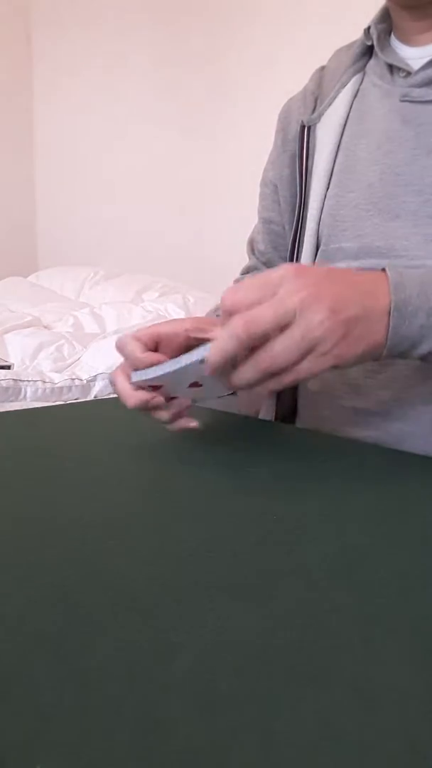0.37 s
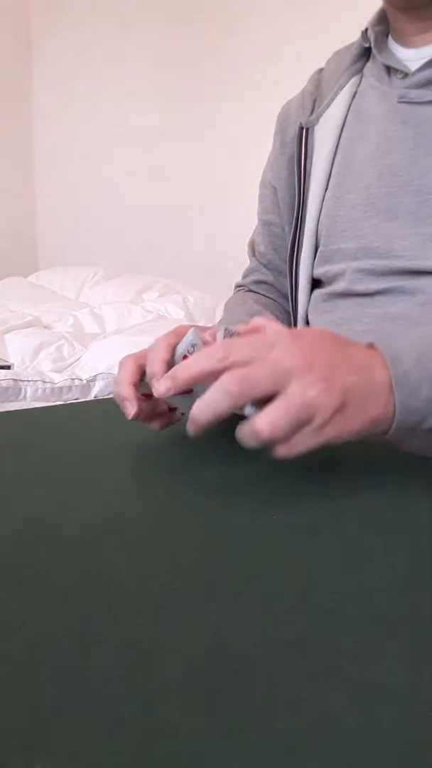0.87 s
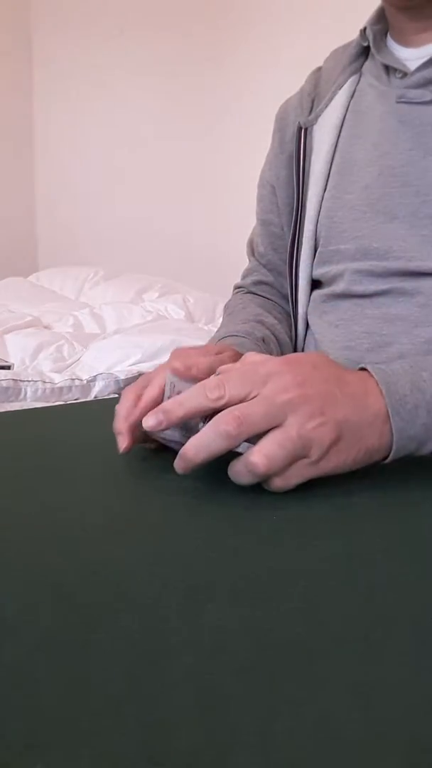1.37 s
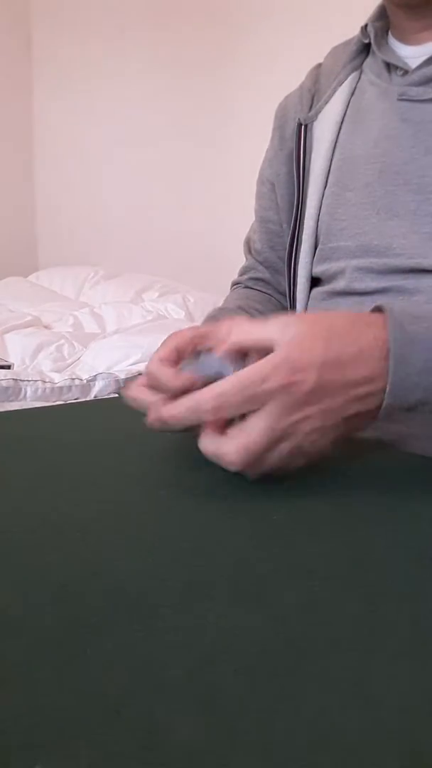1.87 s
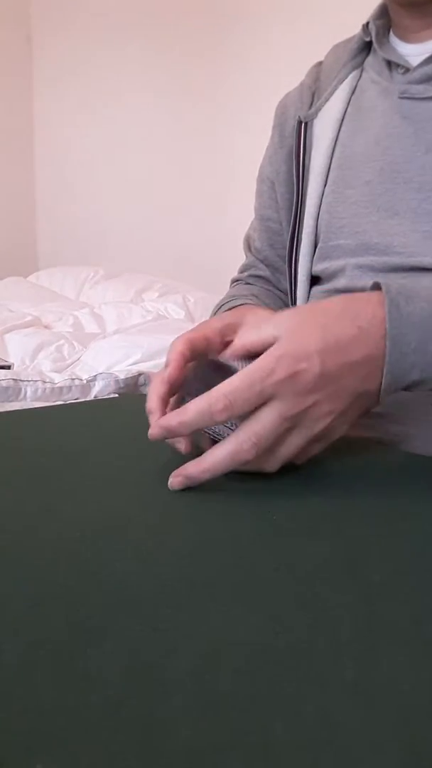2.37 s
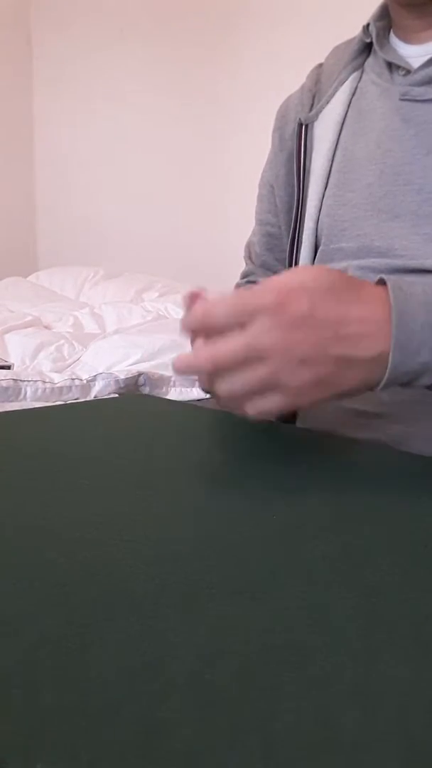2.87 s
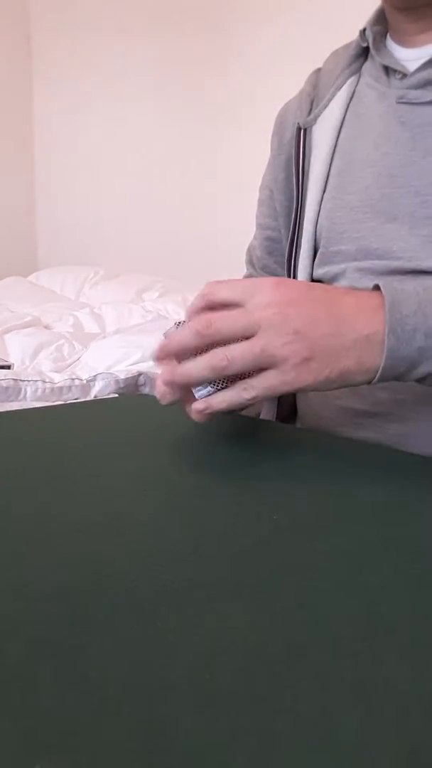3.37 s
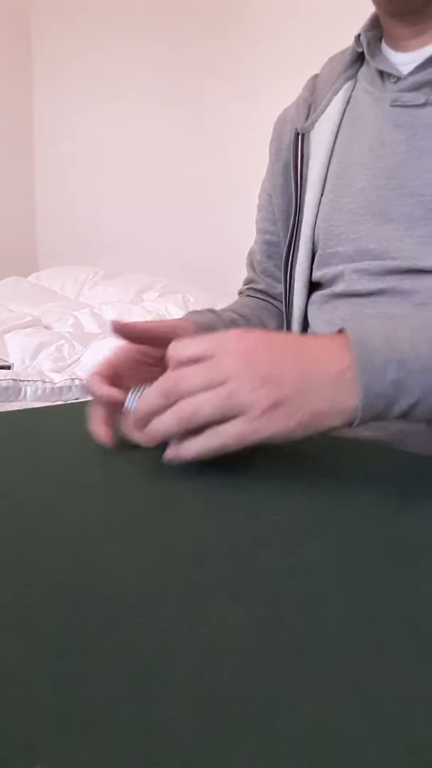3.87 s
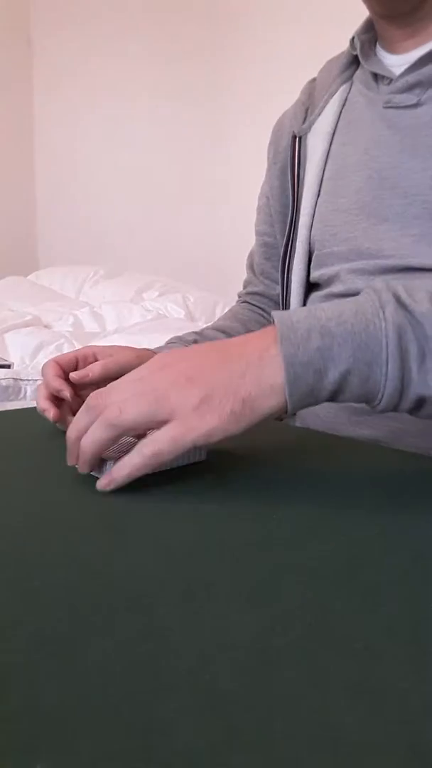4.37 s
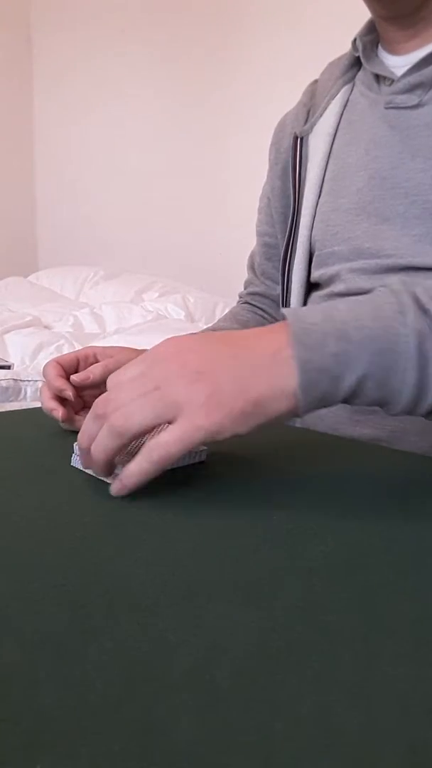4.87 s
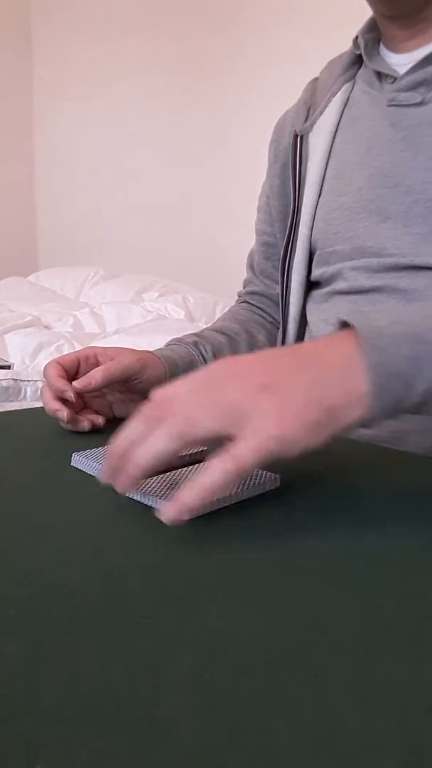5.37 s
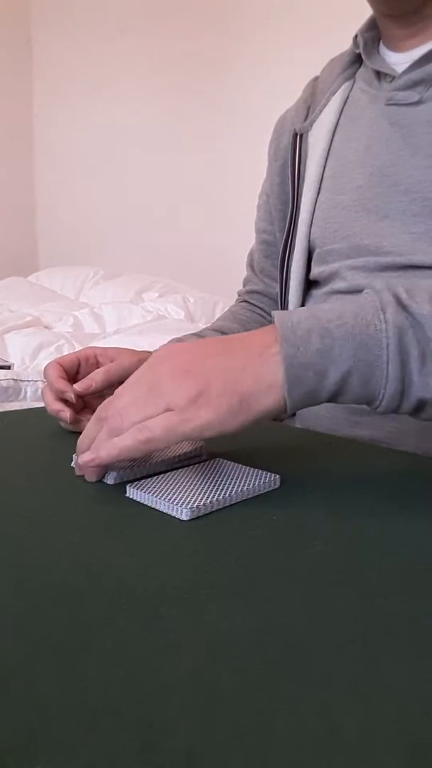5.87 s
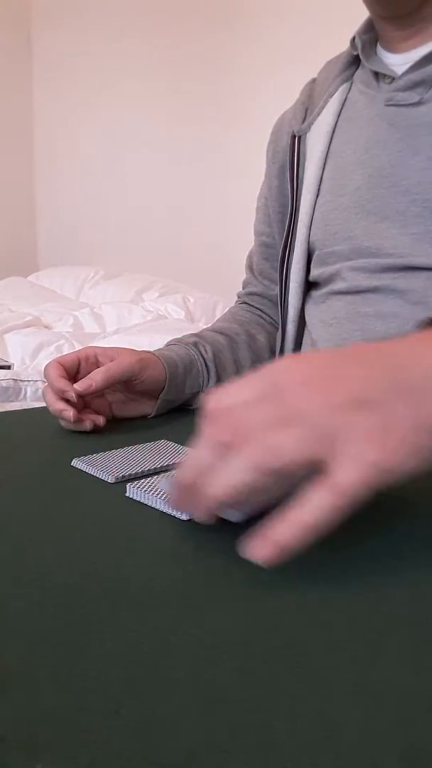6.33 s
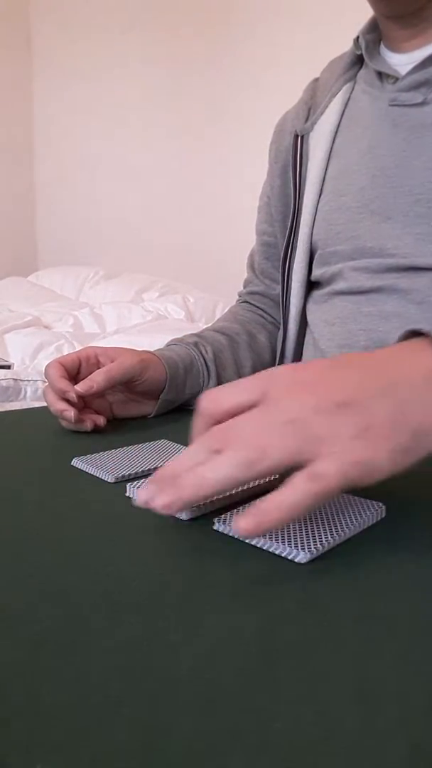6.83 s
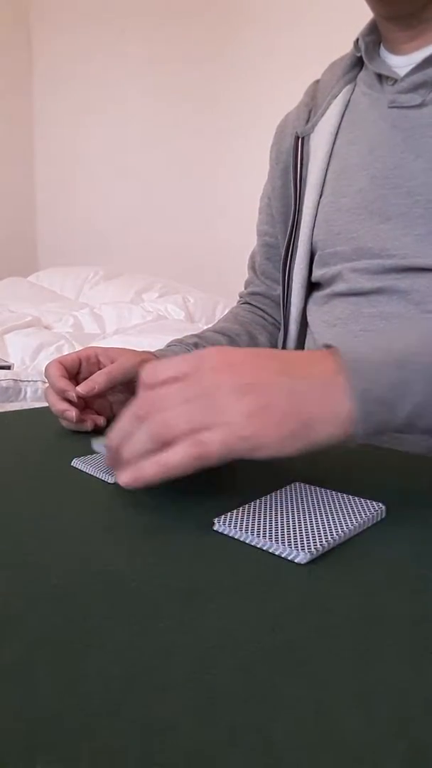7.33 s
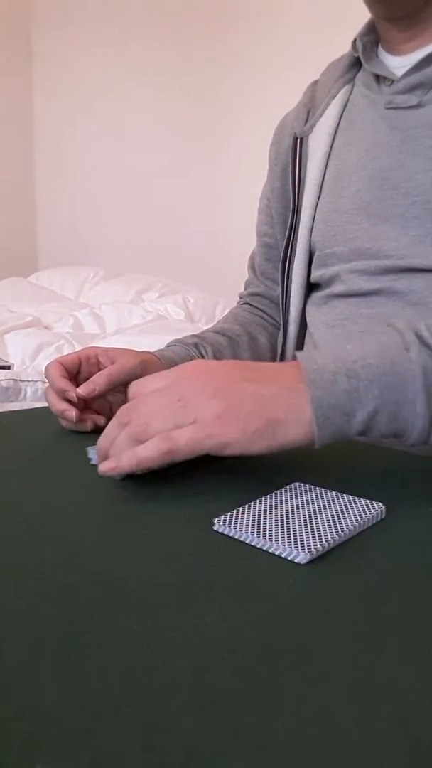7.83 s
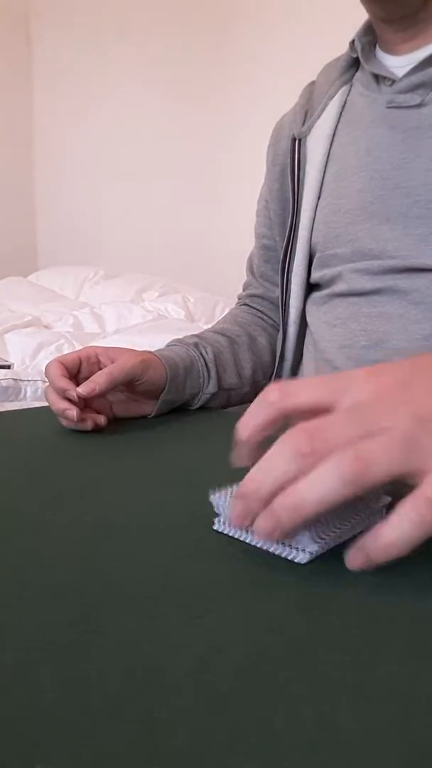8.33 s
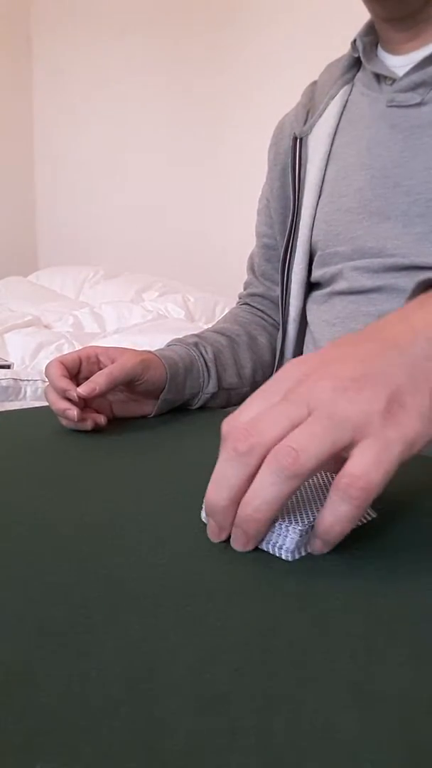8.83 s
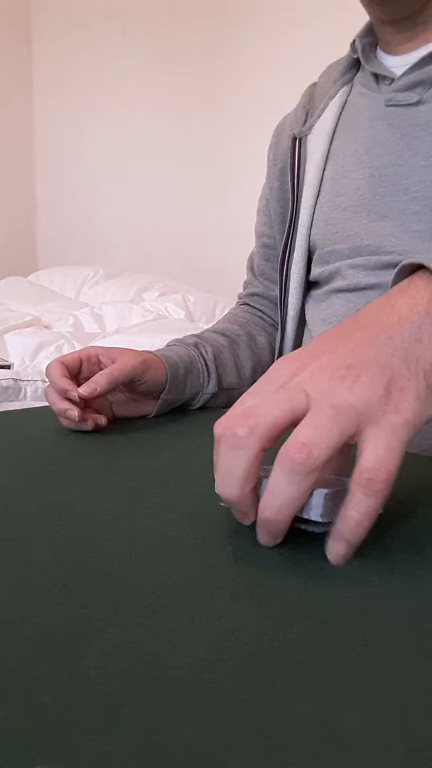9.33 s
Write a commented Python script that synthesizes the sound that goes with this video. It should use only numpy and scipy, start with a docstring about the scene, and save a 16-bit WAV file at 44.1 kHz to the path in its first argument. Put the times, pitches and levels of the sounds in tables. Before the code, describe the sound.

Hands work a deck of playing cards at a cloth-covered table. After faint rubs and ticks comes a loud, rapid riffle of crisp snaps, then a dull thump and a lighter fluttering cascade. A quiet gap of soft sliding follows, then piles are set down with low thuds and restacked with papery taps. Close stereo microphone, heavier on the right, small soft room with faint hum and hiss.

```python
"""Hands riffle a deck of cards, let it cascade, then cut it into piles and restack it on a cloth-covered table.
Card edges snap as short rings and cracks; cards rub and fizz as grainy noise shaped by resonances.
Each pile set down thumps the table top, low resonances that reach the nearer right microphone most.
Late on, the squared-up deck is knocked and rings. A small soft room answers over a faint hum and hiss."""
import sys
import numpy as np
from scipy import signal
from scipy.fft import rfft, irfft, next_fast_len
from scipy.io import wavfile
from scipy.ndimage import map_coordinates

SR = 44100
rng = np.random.default_rng(int(sys.argv[2]) if len(sys.argv) > 2 else 0)


def inscribe(sig):
    """Save sig as 16-bit PCM at rate SR to the path in sys.argv[1].

    A 1-D sig is mono; a 2-D sig holds one channel per row.
    Samples are clipped to [-1, 1] before scaling.
    """
    pcm = np.round(np.clip(np.atleast_2d(sig).T, -1, 1) * 32767)
    wavfile.write(sys.argv[1], SR, pcm.astype(np.int16))


def gain_from_decibels(decibels):
    """Convert decibel values to linear amplitude factors."""
    exponent = np.asarray(decibels, float) / 20
    return 10 ** exponent


N = 417186  # length in samples

# What the squared-up deck rings with; rubbing wakes the lowest three.
# Each row: frequency in Hz, width in Hz, level in dB.
DECK_RINGS = [(388, 69, 2.5), (680, 190, -2), (924, 820, -9.5), (1549, 420, -4), (2880, 210, -14.5),
              (4250, 780, -26)]


def unit(x):
    """Scale to an rms (average strength) of 1."""
    return x / np.sqrt(np.mean(x ** 2) + 1e-20)


def along(points, hz):
    """Read a curve of (Hz, value) points on a log frequency axis."""
    point_hz, values = np.transpose(points)
    return np.interp(np.log(hz + 1), np.log(point_hz + 1), values)


def curves(rows):
    """One value per sample for each column after the time."""
    times, *columns = np.transpose(rows)
    return [np.interp(np.arange(N) / SR, times, column) for column in columns]


def filtered(x, response):
    """Multiply the spectrum of x by a response that depends on frequency."""
    size = next_fast_len(N + SR // 4)
    spectrum = rfft(x, size) * response(np.fft.rfftfreq(size, 1 / SR))
    return irfft(spectrum, size)[..., :N]


def mode(f, hz, width):
    """One resonance: it starts to ring when struck; a wider one dies away sooner."""
    return 1j * f * width / (hz * hz - f * f + 1j * f * width)


def modes(rows):
    """Several resonances added with alternating sign."""
    return lambda f: sum((-1) ** k * gain_from_decibels(db) * mode(f, hz, width) for k, (hz, width, db) in enumerate(rows))


def pair(colour, split_hz, source):
    """Two channels of coloured noise, alike in the bass and less and less related above split_hz."""
    turn = lambda hz: np.pi / 4 * hz / (hz + split_hz)
    mid, side = filtered(source, lambda hz: colour(hz) * [np.cos(turn(hz)), np.sin(turn(hz))])
    return unit(np.array([mid + side, mid - side]))


def grainy(spread_db, grain_s):
    """Noise whose strength varies at random from one tiny contact to the next."""
    knots = rng.standard_normal(int(N / SR / grain_s) + 4)
    strength = gain_from_decibels(spread_db * map_coordinates(knots, [np.arange(N) / SR / grain_s], order=1))
    return unit(rng.standard_normal((2, N)) * strength)


def slide():
    """Fibres catch and let go: a grainy rub, a finer fizz, and the drag that shakes the table."""
    # Resonances of a fanned stream of cards. Each row: frequency in Hz, width in Hz, level in dB.
    fanned = [(1100, 1200, -0.5), (1913, 1200, 0), (2650, 400, 3.5), (4600, 2500, -4.5)]
    # Resonances that rubbing wakes in bent cards. Each row: frequency in Hz, width in Hz, level in dB.
    bent = [(1207.6, 490, 11), (1980, 2100, 7.5), (4330, 1200, -19.5)]
    # Colour of the fizz. Each row: frequency in Hz, relative level per Hz in dB.
    fizz_colour = [(2100, -17.5), (4800, -7), (8200, -6), (16000, -16)]
    laid_down_s, stacked_s = 3.7, 9.2  # the deck reaches the table; it is whole again

    stream_gain, stroke_gain, fizz_gain = sliding()
    rub_gain = stream_gain + stroke_gain
    t = np.arange(N) / SR
    on_table = np.clip((t - laid_down_s) * 5, 0.06, 1)  # the deck is held up until it is laid down

    # cloth evens out the grain
    smooth = 0.6 * on_table
    grains = np.sqrt(1 - smooth) * grainy(spread_db=4, grain_s=0.0035)
    grains = grains + np.sqrt(smooth) * rng.standard_normal((2, N))

    stream_colour = lambda hz: modes(fanned)(hz) / (1 + (hz / 8000) ** 2)
    stroke_colour = lambda hz: modes(bent)(hz) / (1 + (hz / 6500) ** 2)
    rub = stream_gain * pair(stream_colour, 2000, grainy(spread_db=2.5, grain_s=0.0027))
    rub += stroke_gain * pair(stroke_colour, 1600, grains)

    # piles hum lower than fanned cards, more as they grow
    thick = np.interp(t, [laid_down_s, stacked_s], [0.15, 1], left=0)
    pile_hum = unit(filtered(grainy(spread_db=5, grain_s=0.005)[0], modes(DECK_RINGS[:3])))
    rub += thick * rub_gain * gain_from_decibels(3) * pile_hum

    fizz_noise = grainy(spread_db=5, grain_s=0.0018)
    fizz = fizz_gain * pair(lambda hz: gain_from_decibels(along(fizz_colour, hz)), 2300, fizz_noise)
    shake = rng.standard_normal((2, N))
    drag = on_table * rub_gain * gain_from_decibels(34.5) * (shake[1] + 0.47 * shake)  # partly shared by both channels
    return rub, fizz, drag


def sliding():
    """Gains of stream, stroke and fizz: every stroke swells to its peak and fades."""
    # The two streams of running cards. Each row: time in seconds, rub level in dB, fizz level in dB.
    riffle = [(1.21, -70.5, -90.5), (1.27, -46.5, -49), (1.32, -51.5, -60.5), (1.365, -28.5, -40),
              (1.46, -28, -29.5), (1.5, -27, -31.5), (1.535, -36.5, -46.5), (1.56, -29, -40.5),
              (1.62, -31, -46.5), (1.81, -79, -89)]
    cascade = [(2.25, -78, -87), (2.311, -46.5, -46), (2.401, -42, -42.5), (2.47, -38.5, -42.5),
               (2.581, -68, -74.5)]
    # Single slides of cards on cards or cloth. Each row: peak time in seconds, rise in seconds,
    # fall in seconds, rub level in dB, fizz against rub in dB.
    strokes = [(.12, 0.042, 0.27, -60.5, -3.5), (0.522, 0.3, 0.14, -60, -4.5), (0.699, .1, .08, -56.5, -6),
               (1.942, 0.11, 0.095, -58.5, -11), (2.168, 0.082, 0.054, -54.5, -13.5),
               (2.66, 0.12, 0.141, -62, -20), (3.201, 0.19, 0.23, -76.5, 10), (3.44, 0.11, .12, -65, 2),
               (3.928, 0.012, 0.079, -58, -30), (4.219, 0.42, 0.38, -59, -10.5),
               (5.09, 0.021, 0.49, -65, -7), (5.322, 0.28, 0.1185, -58.5, -7),
               (5.729, 0.024, 0.073, -62.5, -16), (6.619, 0.057, 0.037, -54, -9),
               (6.678, 0.091, 0.075, -62.5, -1.5), (7.025, 0.06, 0.08, -53.5, -4),
               (7.099, 0.091, 0.215, -60, -12), (7.209, .12, .07, -61.5, -12.5),
               (7.642, 0.016, 0.33, -62.5, -3), (7.852, 0.19, 0.23, -57, -12), (8.56, 0.13, 0.032, -57, -5),
               (8.73, 0.29, 0.16, -57.5, -7.5), (8.943, 0.017, 0.16, -58.5, -14),
               (8.985, 0.067, 0.021, -59, -8.5), (9.083, 0.028, 0.22, -61, -13),
               (9.213, 0.065, 0.043, -64.5, -0.5), (9.38, 0.097, .1, -53.5, -5),
               (9.45, 0.068, .1, -45.5, -11)]
    depth_db, roundness = 23.5, 1.3  # drop at the ends of rise and fall; 1 = pointed, more = rounder

    t = np.arange(N) / SR
    power = np.zeros((3, N))
    for stream in riffle, cascade:
        running = (t > stream[0][0]) * (t < stream[-1][0])
        power[::2] += gain_from_decibels(curves(stream)) ** 2 * running
    for peak_s, rise, fall, db, fizz_db in strokes:
        away = np.abs(t - peak_s) / np.where(t < peak_s, rise, fall)
        stroke_db = db - depth_db * away ** roundness
        power[1:] += gain_from_decibels(stroke_db + [[0], [fizz_db]]) ** 2
    return np.sqrt(power)


def snaps():
    """A flick or tap gives a short ring at its own pitch; higher ones, from stiffer edges, also crack more."""
    # Card edges snapping free or tapping; the two low rows near 2.13 s are the dull upper part
    # of a pile's thump. Each row: start in seconds, level in dB, pitch in Hz.
    flicks = [(0.112, -42, 1350), (0.479, -33, 1863), (0.491, -37, 1390), (0.522, -25.5, 1580),
              (0.624, -36, 1335), (1.228, -23, 1964), (1.252, -30, 2000), (1.261, -21, 1530),
              (1.272, -29, 1800), (1.281, -24.5, 1230), (1.292, -21, 1100), (1.349, -8, 4800),
              (1.364, -12.5, 2650),  (1.381, -9.5, 2179), (1.402, -6, 2883), (1.445, -6.5, 4500),
              (1.45, -8.5, 1940), (1.454, -10.5, 7500), (1.466, -8.5, 7000), (1.475, -13, 4800),
              (1.496, -11, 2500), (1.514, -10.5, 1293), (1.543, -8.5, 2667), (1.592, -10, 1357),
              (1.597, -12, 2352), (1.626, -11, 2750), (2.122, -25, 457.5), (2.136, -25, 485),
              (2.334, -24, 2000), (2.348, -17, 2100), (2.36, -20, 3443), (2.38, -11.5, 1277),
              (2.383, -12.5, 3480), (2.401, -17.5, 1300), (2.416, -22, 3000), (2.42, -18.5, 1600),
              (2.447, -22, 1530), (2.466, -23.5, 2000), (2.931, -41.5, 1313), (3.933, -46, 2100),
              (5.263, -42, 1990), (5.715, -43, 1310), (7.637, -28.5, 1310), (8.441, -28.5, 843)]
    out = np.zeros((2, N + SR))
    t = np.arange(SR // 20) / SR
    # a fast crack with a fainter, slower tail
    burst = (1 - np.exp(-t / 0.00034)) * (gain_from_decibels(-60 * t / 0.023) + 0.13 * gain_from_decibels(-60 * t / 0.14))
    for s, db, hz in flicks:
        # the ring falls by 60 dB in 11 cycles
        ring = np.sin(2 * np.pi * hz * t) * gain_from_decibels(-60 * t * hz / 11) * (1 - np.exp(-t * hz * 4))
        noise = rng.standard_normal((3, len(t)))
        pole = np.exp(-2 * np.pi * min(2.7 * hz, 6500) / SR)
        crack = signal.lfilter([1], np.poly([pole, pole, pole]), noise[0] + 2.2 * noise[1:])
        crack *= min(hz + 900, 5000) / 7000 / np.std(crack)
        out[:, round(s * SR):][:, :len(t)] += gain_from_decibels(db) * (ring + crack * burst)
    # a thin card moves little bass
    return signal.lfilter([1, -1], [1, -np.exp(-2 * np.pi * 400 / SR)], out[:, :N])


def knocks():
    """Each knock is a short scratchy contact that rings the block of cards."""
    # The squared-up deck knocked by a pile or a finger. Each row: start in seconds, strength in dB.
    hits = [(8.501, -37.5), (8.529, -28), (8.551, -37), (8.567, -26.5), (8.652, -37), (8.706, -35),
            (8.969, -47), (9.408, -32), (9.424, -28), (9.433, -31), (9.444, -31), (9.454, -23.5)]
    contact_s = 0.0033  # sets the length of the contact
    blows = np.zeros(N + SR)
    t = np.arange(SR // 40) / SR
    for s, db in hits:
        bump = t / contact_s * np.exp(-2 * t / contact_s)
        scratch = 0.95 + 0.7 * rng.standard_normal(len(t))
        blows[round(s * SR):][:len(t)] += gain_from_decibels(db) * bump * scratch
    return gain_from_decibels(27.5) * filtered(blows[:N], modes(DECK_RINGS))


def table(drag):
    """Soft pushes and the drag of cards set the table top ringing low."""
    # Resonances of the table top. Each row: frequency in Hz, width in Hz, right level in dB, left level in dB.
    top_rings = [(58, 71, -12.5, -18.5), (91.9, 19, -2, -13.5), (122.5, 12, 2, -9.5),
                 (153.8, 13, 1.5, -11.5), (215.5, 24, -0.5, -20.5), (330, 60, -16, -27)]
    pushes = np.zeros(N + SR)
    push = np.hanning(80)  # flesh and cloth spread each push over about 2 ms
    for s, db in thumps():
        pushes[round(s * SR):][:len(push)] += 1.9 * gain_from_decibels(db) * push

    def body(f):
        """The resonances, added with alternating sign, for left and right."""
        return sum((-1) ** k * gain_from_decibels([[left], [right]]) * mode(f, hz, width)
                   for k, (hz, width, right, left) in enumerate(top_rings))

    # weaken the deepest bass below 50 Hz and the part above 900 Hz
    band = lambda f: (1j * f / (50 + 1j * f) / (1 + 1j * f / 900)) ** 2
    return filtered(pushes[:N] + drag, lambda f: body(f) * band(f))


def thumps():
    """A pile touches with its edge, falls flat and settles; a hand just presses."""
    # Piles set down on the table. Each row: flat-down time in seconds, strength in dB,
    # lead of the edge in seconds.
    landings = [(2.137, -4.5, 0.017), (4.349, -12, 0.024), (5.321, -13.5, 0.01805), (5.747, -17, 0.024),
                (6.625, -14, .017), (7.002, -19, 0.016), (7.648, -4, 0.00792), (7.678, -5.5, .015),
                (8.573, -5.5, 0.039)]
    # Hands pressing on the table top. Each row: start in seconds, strength in dB.
    presses = [(1.351, -14), (1.451, -11), (1.54, -8.5), (1.586, -10.5), (1.603, -5.5), (2.191, -10.5),
               (7.134, -21.5), (7.21, -22), (7.867, -15.5), (8.446, -5), (8.473, -11), (8.658, -15),
               (8.711, -18.5), (9.092, -21), (9.436, -16.5), (9.446, -10.5)]
    edge_db, settle_db = -4, -8.5  # against the flat blow
    settle_late = 1.5  # settling delay, counted in edge leads
    pushes = list(presses)
    for s, db, lead in landings:
        pushes += [(s - lead, db + edge_db), (s, db), (s + settle_late * lead, db + settle_db)]
    return pushes


def puff():
    """One slap of cards shoves air at the right microphone: a sharp dip, then a slower swell."""
    u = (np.arange(N) / SR - 1.4068) / 0.00059  # time from the dip, in units of 0.59 ms
    swell = 0.5 * np.exp(-np.abs(u - 2.4) / np.where(u > 2.4, 2.2, 0.6))
    dip = np.exp(-u ** 2 / 2)
    return gain_from_decibels([[-24], [-6]]) * (swell - dip)


def room(x):
    """Each frequency of the room's answer, a tail of noise, dies at its own speed."""
    # The room's decay. Each row: frequency in Hz, time to fall by 60 dB in seconds.
    decay = [(300, 0.59), (1000, 0.066), (5000, 0.15), (12000, 0.03)]
    hz, t, spectrum = signal.stft(rng.standard_normal((2, SR // 2)), SR, nperseg=256)
    fade = gain_from_decibels(-60 * t / along(decay, hz)[:, None])
    tail = signal.istft(spectrum * fade, SR, nperseg=256)[1]
    delayed = np.pad(x, (200, 0))[None]  # the answer comes 200 samples late
    return signal.fftconvolve(delayed, tail / np.linalg.norm(tail[0]), axes=1)[:, :N]


def quiet_room():
    """Steady coloured noise makes a faint hum and hiss, a little stronger on the right."""
    # Colour of the quiet room. Each row: frequency in Hz, relative level per Hz in dB.
    quiet = [(20, -28.5), (50, -15.5), (75, -17.5), (120, -13.5), (137, -6), (165, -16.5), (400, -19),
             (1000, -23), (3000, -29), (8000, -41.5), (13000, -34), (16000, -38.5)]
    noise = pair(lambda hz: gain_from_decibels(along(quiet, hz)), 190, rng.standard_normal((2, N)))
    return gain_from_decibels(-65.5) * noise * gain_from_decibels([[-0.7], [0.7]])


def scene():
    """Cards lean right in the mids, left in the top treble; table, room, puff and quiet noise join them."""
    # Where the hands are. Each row: time in seconds, left minus right in dB.
    hands = [(3.6, -7.5), (3.95, -13), (9.46, -12)]
    rub, fizz, drag = slide()
    pan_db = curves(hands)[0] * [[0.5], [-0.5]]
    cards = (snaps() + knocks() + rub) * gain_from_decibels(pan_db) + fizz * gain_from_decibels(0.4 * pan_db)
    lean_db = lambda hz: np.clip(np.log2(hz / 6000 + 1e-9), 0, 1) * [[4], [-4]]
    lead_s = 3.5e-5 * np.array([[1], [-1]])  # the microphones sit a few cm apart; left hears first
    cards = filtered(cards, lambda hz: gain_from_decibels(lean_db(hz)) * np.exp(2j * np.pi * hz * lead_s))
    top = table(drag)
    echo = room(gain_from_decibels(-13) * cards.mean(0) + gain_from_decibels(-19) * top[1])
    return cards + top + echo + puff() + quiet_room()


def top_cut(x):
    """Nothing passes above the cut-off."""
    return signal.sosfilt(signal.butter(12, 16830, fs=SR, output="sos"), x)


def record(dry):
    """Little passes above 16 kHz, and the converter adds a tiny constant offset."""
    dulled = filtered(dry, lambda hz: np.where(hz < 15950, 1, 0.03))
    mix = dulled - 0.0004
    return top_cut(mix)


dry = scene()
out = record(dry)
inscribe(out)
```